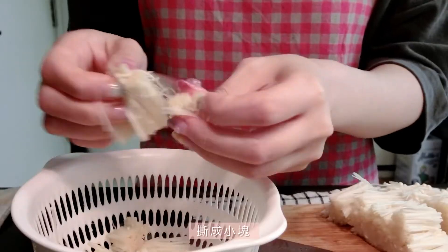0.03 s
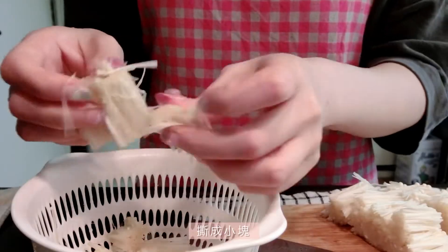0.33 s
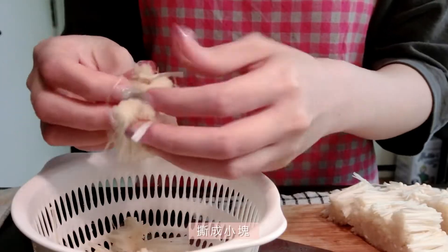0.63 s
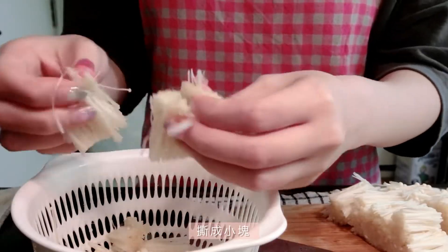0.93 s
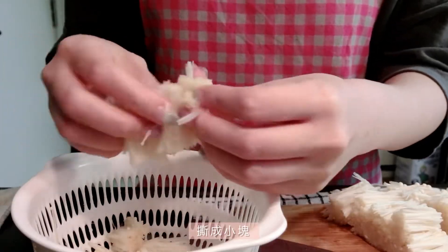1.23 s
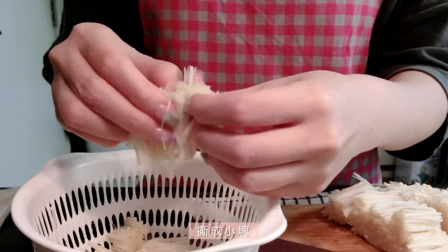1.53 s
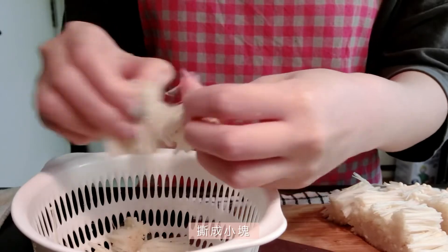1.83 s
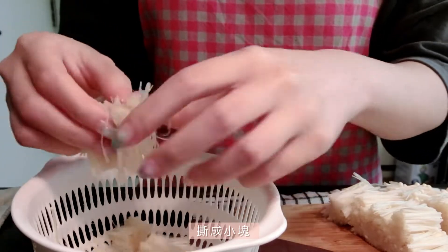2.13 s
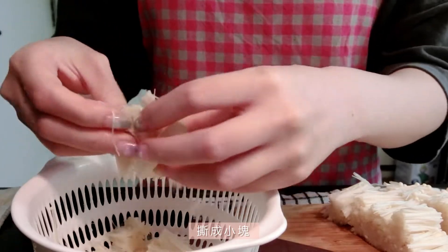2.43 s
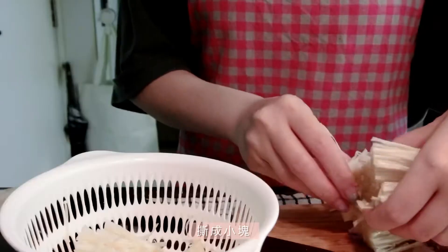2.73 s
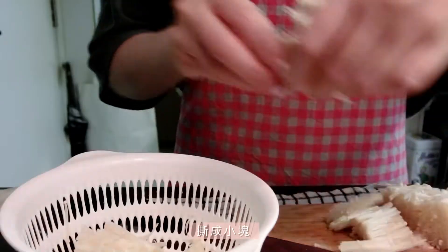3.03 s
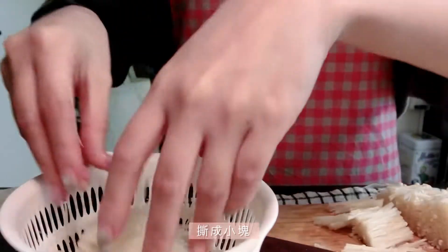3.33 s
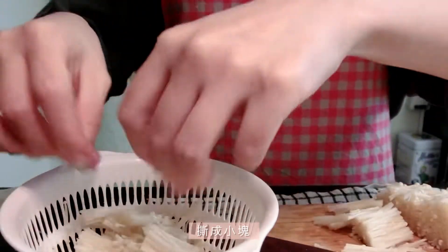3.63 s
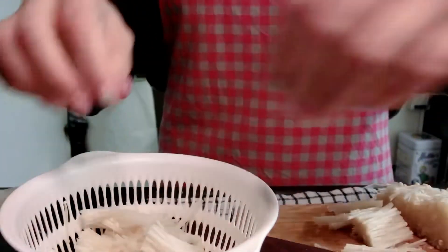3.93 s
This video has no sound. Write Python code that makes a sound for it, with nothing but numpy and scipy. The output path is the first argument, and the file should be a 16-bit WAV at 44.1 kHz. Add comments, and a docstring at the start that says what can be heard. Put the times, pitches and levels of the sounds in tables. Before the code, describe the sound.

Moist, fibrous stems are softly torn by hand, close up, with short pulls at about 0.8 and 1.8 seconds amid crinkling, tiny snaps and wet pops. One stem squeaks at 1.3 seconds, and a dull bump comes at 2. Stems scuff a wooden board around 2.8, a piece slides into a bowl at 3.3, then sleeves swish faintly. A low kitchen appliance hum continues throughout.

```python
"""Moist, fibrous stems, pulled apart by hand, close up in a quiet kitchen.
Each pull is a swell of tiny fibre breaks; between pulls the fingers crinkle the stems, single fibres
snap and moisture pops. One stem squeaks, there is one soft bump, the bundle scuffs a wooden board,
a piece slides into the bowl and sleeves swish. An appliance hums throughout."""
import sys
import numpy as np
from scipy import signal
from scipy.fft import rfft, irfft, next_fast_len
from scipy.io import wavfile
from scipy.ndimage import map_coordinates

SR = 44100
rng = np.random.default_rng(int(sys.argv[2]) if len(sys.argv) > 2 else 0)


def wrap_up_sound(samples):
    """Save the sound to the file named by the first command line argument, as 16-bit audio."""
    columns = np.atleast_2d(samples).T
    # keep every value between -1 and 1, then stretch to whole-number steps
    tamed = np.clip(columns, -1, 1)
    steps = np.round(tamed * 32767).astype(np.int16)
    wavfile.write(sys.argv[1], SR, steps)


N = 176400

# Deepest hum, swelling and sagging. Each row: time in seconds, level in dB before DEEP_TRIM_DB.
DEEP_HUM_LEVELS = [(0.0, -71), (0.05, -49), (0.13, -64), (0.18, -49), (0.46, -44), (1.04, -48.5),
                   (1.1, -67), (1.15, -50), (1.76, -49.5), (1.78, -52.5), (2.65, -46), (2.76, -59.5),
                   (3.49, -43.5), (3.78, -45.5), (3.9, -57), (4.0, -51)]
# Appliance tones. Each row: frequency in Hz, level in dB, unsteadiness 0-1, waver rate per second.
HUM_TONES = [(130.1, -50.5, 0.2, 19), (317.6, -61.5, 0.56, 15), (520.6, -75, 0.63, 25),
             (993, -77.5, 0.73, 40), (2950, -80, .75, 60), (4635, -85.5, 0.5, 35)]

# Hand strokes. Each row: peak time in seconds, level in dB, rise and fall in seconds,
# fizz in dB relative to that level.
PULLS = [(.799, -56, 0.03, .018, 1.5), (1.757, -56.5, 0.016, 0.025, 3), (1.771, -63, 0.0093, 0.028, 7)]
GRIP_SHIFTS = [(.025, -63, 0.066, 0.079, 3.5), (.238, -71, .015, 0.063, 5), (.385, -72, 0.022, 0.05, 4),
               (.725, -63.5, 0.062, .04, 0), (.97, -66, 0.13, 0.12, 1.5), (1.26, -68, 0.075, 0.072, 5),
               (1.445, -69, .07, 0.16, 3), (1.58, -76, 0.079, 0.065, 6), (1.93, -73, 0.11, 0.2, 5),
               (2.46, -71.5, 0.1, 0.16, -4), (2.75, -74.5, 0.23, 0.43, -10), (3.1, -70, 0.049, 0.069, -4)]
SLIDES = [(3.248, -60.5, .02, .014, -6), (3.268, -55, 0.013, 0.023, -3.5)]  # a torn piece slides off the fingers
# Single fibres. Each row: start in seconds, crack level in dB, tick level in dB.
FIBRE_SNAPS = [(0.2362, -60, -56), (.366, -74, -56), (.585, -74, -62), (.903, -70, -59), (0.976, -65, -62),
               (1.08, -59.5, -61), (1.135, -76, -58), (1.165, -72, -46.5), (1.257, -70, -51),
               (1.3243, -66, -41), (1.339, -59, -58), (1.426, -62, -55), (1.439, -65, -57),
               (1.479, -59.5, -64), (1.713, -72, -51), (1.742, -58, -50), (1.7526, -53, -60),
               (1.7635, -55, -51), (1.7692, -67, -49), (1.866, -71, -59), (1.953, -64, -68),
               (2.451, -62.5, -68), (2.475, -66, -56), (2.633, -74, -58), (2.734, -72, -57)]
# Moisture between stems. Each row: start in seconds, level in dB, pitch in Hz.
WET_POPS = [(0.7613, -45, 2940), (1.081, -51, 2510), (1.106, -51, 3100), (1.505, -49, 2400)]
# One squeak. Each row: peak time in seconds, level in dB, rise and fall in seconds, pitch in Hz.
SQUEAK_SLIPS = [(1.263, -58, 0.013, 0.014, 1080), (1.274, -53.5, .017, 0.0086, 970)]
# Brushing contacts. Each row: peak time in seconds, level in dB, rise and fall in seconds.
BOARD_SCUFFS = [(2.811, -56.5, .005, 0.011), (2.827, -61, .005, .018), (2.865, -66, 0.017, .02),
                (2.935, -62, 0.013, 0.02)]
SLEEVE_SWISHES = [(3.36, -68, .15, 0.27), (3.615, -70, .025, 0.055), (3.85, -66.5, 0.088, 0.1)]

# Noise spectra. Each row: frequency in Hz, relative density in dB.
DRONE_SPECTRUM = [(15, -22), (35, -1), (62, 5), (78, -2), (110, 2), (130, 3), (160, -3), (185, -2),
                  (255, -5), (280, -10.5), (335, -3.5), (385, -9.5), (440, -7.5), (468, -16), (510, -10),
                  (590, -16), (780, -16), (890, -20), (985, -20), (1150, -26.5), (2000, -43.5), (5000, -99)]
AIR_SPECTRUM = [(400, -9), (1200, -1), (1800, 0.5), (2100, -1), (2700, -0.5), (2950, 3.5), (3200, 0),
                (3550, 1.5), (4000, -6.5), (4400, -3.5), (4650, -4), (4900, -5.5), (6200, -7.5),
                (10000, -9), (16000, -8)]
GRIP_SPECTRUM = [(600, 7.5), (1500, -27), (3000, -8), (5200, 4), (8000, 1), (11000, -1), (16000, -19)]
FIZZ_SPECTRUM = [(3000, -32), (8000, -12), (11000, -11), (12200, -0.5), (14200, 1.5), (16000, -0.5)]  # finest fibres
CRACK_SPECTRUM = [(800, -24), (2200, -11), (5500, 0), (8000, -3), (11000, -6.5), (16000, -13)]
PULL_SPECTRUM = [(500, -26), (1100, -5), (2200, -1.5), (3500, 3), (6500, 2.5), (9000, 3), (11000, -5.5),
                 (16000, -10)]
BUMP_SPECTRUM = [(100, -20), (165, -1), (212, 8), (265, -7), (325, 5.5), (420, -11), (900, -28),
                 (2000, -43)]
BOARD_SPECTRUM = [(200, -18), (450, -1), (720, 4), (1100, -5), (1500, -8), (2300, -20), (6000, -34)]
SLIDE_SPECTRUM = [(500, -18), (1200, -1), (2200, 2), (3500, -0.5), (6000, 4.5), (8500, 0), (11000, -5),
                  (16000, -12)]
CLOTH_SPECTRUM = [(500, -12), (1200, -6), (2400, -2.5), (3300, 0), (4500, -23), (9000, -27)]

# Stereo likeness. Each row: frequency in Hz, left-right correlation 0-1.
ROOM_CORRELATION = [(60, 0.96), (130, 1), (250, 0.87), (500, 0.95), (1000, 0.64), (3000, 0.31),
                    (6000, 0.032), (14000, 0.033)]
HAND_CORRELATION = [(1000, 0.49), (3000, 0.94), (7000, 0.28), (11000, 0.22), (14000, 0.68)]

DEEP_HZ, DEEP_TRIM_DB = 45.14, -0.86
DRONE_DB, AIR_DB, ROOM_PAN_DB = -50, -62, -1.35
GRIP_BREAKS_PER_S, PULL_BREAKS_PER_S, SLIDE_BREAKS_PER_S = 500, 1300, 5000
BREAK_DECAY_S, BREAK_SPREAD_DB, FRICTION_SHARE = 0.0002, 3, 0.35
CRACK_DECAY_S, TICK_DECAY_S, TAIL_DECAY_S, TAIL_DB = 0.0018, 0.0006, 0.004, -13
DIP_AT_S, DIP_HOLD_S, DIP_RECOVERY_S, DIP_DB = 2.527, 0.004, 0.012, -12
CUTOFF_HZ = 15850
TIME_S = np.arange(N) / SR


def amp(db):
    """Decibels to gain."""
    return 10 ** (np.asarray(db) / 20)


def unit_rms(x):
    """x at rms 1."""
    return x / np.sqrt(np.mean(x ** 2) + 1e-20)


def log_interp(points, hz):
    """Interpolate (Hz, value) points on a log axis."""
    points_hz, values = np.transpose(points)
    return np.interp(np.log(hz + 1), np.log(points_hz + 1), values)


def filtered(x, response):
    """Apply a gain given as a function of Hz."""
    size = next_fast_len(N + SR // 2)
    return irfft(rfft(x, size) * response(np.fft.rfftfreq(size, 1 / SR)), size)[..., :N]


def coloured(white_pair, spectrum, correlation):
    """Two white signals to left and right with this spectrum and correlation, power kept."""
    def mid_side_gains(hz):
        angle = np.arccos(np.clip(log_interp(correlation, hz), -1, 1)) / 2
        return unit_rms(amp(log_interp(spectrum, hz))) * [np.cos(angle), np.sin(angle)]
    mid, side = filtered(white_pair, mid_side_gains)
    return np.array([mid + side, mid - side])


def panned(x, db):
    """Left up and right down by db."""
    return x * amp([[db], [-db]])


def noise():
    """Two independent white noises."""
    return rng.standard_normal((2, N))


def swell(peak_s, rise_s, fall_s):
    """Near-exponential rise to 1 at peak_s, then decay."""
    t = TIME_S - peak_s
    return np.exp(-np.abs(t / np.where(t < 0, rise_s, fall_s)) ** 1.07)


def wobble(knots_per_s):
    """Smooth random curve."""
    return map_coordinates(rng.standard_normal(4096), [TIME_S * knots_per_s + 2], mode="wrap")


def wavering_tone(hz, unsteadiness, rate_per_s):
    """Tone of rms 1 with wandering level and phase."""
    wander = 1 + unsteadiness * (wobble(rate_per_s) + 1j * wobble(rate_per_s))
    return unit_rms(np.real(wander * np.exp(2j * np.pi * hz * TIME_S)))


def room():
    """Deep hum and higher appliance tones over a low drone and a faint rush of air."""
    deep_db = DEEP_TRIM_DB + np.interp(TIME_S, *np.transpose(DEEP_HUM_LEVELS))
    deep = amp(deep_db) * wavering_tone(DEEP_HZ, unsteadiness=0.1, rate_per_s=9)
    hum = sum(amp(db) * wavering_tone(hz, *waver) for hz, db, *waver in HUM_TONES)
    drone = amp(DRONE_DB) * coloured(noise(), DRONE_SPECTRUM, ROOM_CORRELATION)
    air = amp(AIR_DB) * coloured(noise(), AIR_SPECTRUM, ROOM_CORRELATION)
    return panned(deep + hum + drone, ROOM_PAN_DB) + panned(air, db=-0.86)


def fibre_breaks(breaks_per_s):
    """Dense tiny breaks of uneven size on a bed of friction, rms 1."""
    sizes = amp(BREAK_SPREAD_DB * np.minimum(rng.exponential(size=N), 4))
    impulses = sizes * (rng.random(N) < breaks_per_s / SR)
    power = signal.lfilter([1], [1, -np.exp(-1 / (SR * BREAK_DECAY_S))], impulses ** 2)
    return noise() * np.sqrt(FRICTION_SHARE + (1 - FRICTION_SHARE) * power / power.mean())


def hand_strokes(strokes, spectrum, breaks_per_s):
    """Each stroke strains coarse fibres and, with them, fine ones that fizz."""
    coarse_gain = sum(amp(db) * swell(s, rise_s, fall_s) for s, db, rise_s, fall_s, _ in strokes)
    fizz_gain = sum(amp(db + fizz_db) * swell(s, rise_s, fall_s)
                    for s, db, rise_s, fall_s, fizz_db in strokes)
    coarse = coloured(coarse_gain * fibre_breaks(breaks_per_s), spectrum, HAND_CORRELATION)
    fizz = coloured(fizz_gain * fibre_breaks(breaks_per_s), FIZZ_SPECTRUM, HAND_CORRELATION)
    return coarse + fizz


def fibre_snaps():
    """A fibre gives way with a thin tick and a longer crack; hands and table scatter a short tail."""
    crack_gain, tick_gain = np.zeros(N), np.zeros(N)
    for start_s, crack_db, tick_db in FIBRE_SNAPS:
        t = np.abs(TIME_S - start_s)
        onset = 2 * (TIME_S >= start_s)
        tail = amp(TAIL_DB) * np.exp(-t / TAIL_DECAY_S)
        crack_gain += amp(crack_db) * onset * (np.exp(-t / CRACK_DECAY_S) + tail)
        tick_gain += amp(tick_db) * onset * (np.exp(-t / TICK_DECAY_S) + tail)
    cracks = coloured(crack_gain * noise(), CRACK_SPECTRUM, HAND_CORRELATION)
    ticks = coloured(tick_gain * noise(), FIZZ_SPECTRUM, HAND_CORRELATION)
    return cracks + ticks


def wet_pops(decay_s=0.00081):
    """Films of moisture part, each ringing for a few cycles."""
    pops = np.zeros(N)
    for start_s, db, hz in WET_POPS:
        t = np.maximum(TIME_S - start_s, 0)
        pops += amp(db) * np.exp(-t / decay_s) * np.sin(2 * np.pi * hz * t)
    return pops


def stem_squeak():
    """A moist stem slips under a finger: a rough note, then a lower one overlapping it."""
    return sum(amp(db) * swell(s, rise_s, fall_s) * wavering_tone(hz, unsteadiness=0.6, rate_per_s=200)
               for s, db, rise_s, fall_s, hz in SQUEAK_SLIPS)


def bump(level_db=-46):
    """Soft, dull bump as the hands fly apart."""
    gain = amp(level_db) * swell(peak_s=2.027, rise_s=0.033, fall_s=0.038)
    return gain * coloured(noise(), BUMP_SPECTRUM, ROOM_CORRELATION)


def board_scuffs():
    """Stems brush the wooden board as the bundle is lifted."""
    force = sum(amp(db) * swell(s, rise_s, fall_s) for s, db, rise_s, fall_s in BOARD_SCUFFS)
    return coloured(force * fibre_breaks(PULL_BREAKS_PER_S), BOARD_SPECTRUM, ROOM_CORRELATION)


def sleeves():
    """Cloth swishes faintly as the arms reach over the bowl."""
    speed = sum(amp(db) * swell(s, rise_s, fall_s) for s, db, rise_s, fall_s in SLEEVE_SWISHES)
    return speed * coloured(noise(), CLOTH_SPECTRUM, ROOM_CORRELATION)


def scene():
    """Fibres near the centre; room and duller sounds lean right."""
    pulls = hand_strokes(PULLS, PULL_SPECTRUM, PULL_BREAKS_PER_S)
    grips = hand_strokes(GRIP_SHIFTS, GRIP_SPECTRUM, GRIP_BREAKS_PER_S)
    slides = hand_strokes(SLIDES, SLIDE_SPECTRUM, SLIDE_BREAKS_PER_S)
    fibres = pulls + grips + slides + fibre_snaps() + wet_pops()
    background = room()
    duller = bump() + board_scuffs() + sleeves() + stem_squeak()
    return background + panned(duller, ROOM_PAN_DB) + panned(fibres, db=0.2)


def record(dry):
    """One brief level dip, then a brick-wall low-pass."""
    recovered = (TIME_S - DIP_AT_S - DIP_HOLD_S) / DIP_RECOVERY_S
    gain_db = DIP_DB * (TIME_S >= DIP_AT_S) * np.clip(1 - recovered, 0, 1)
    return filtered(dry * amp(gain_db), lambda hz: hz < CUTOFF_HZ)


dry = scene()
out = record(dry)
wrap_up_sound(out)
```